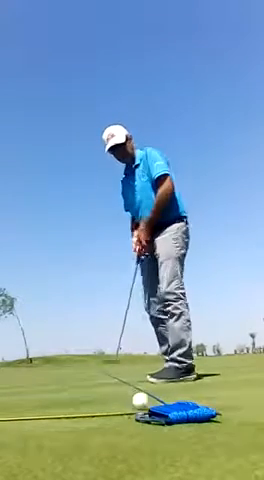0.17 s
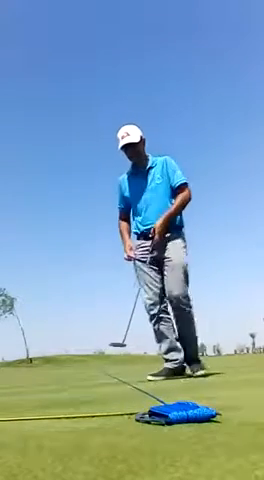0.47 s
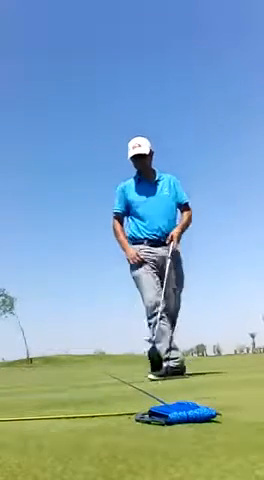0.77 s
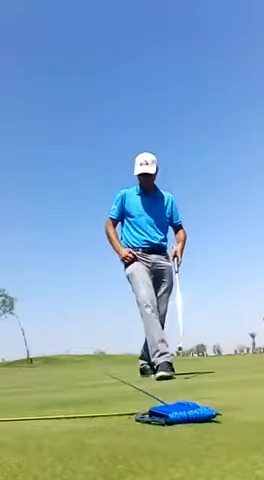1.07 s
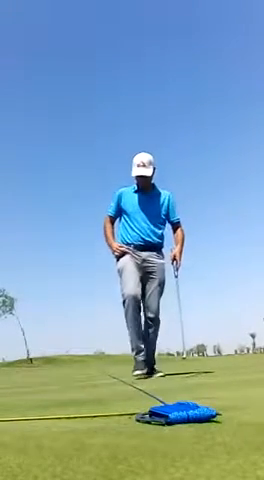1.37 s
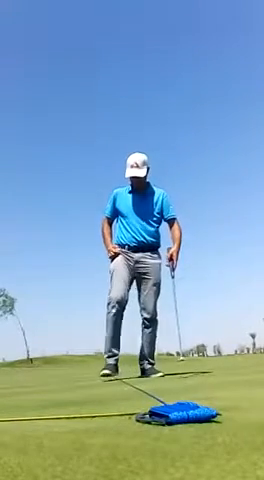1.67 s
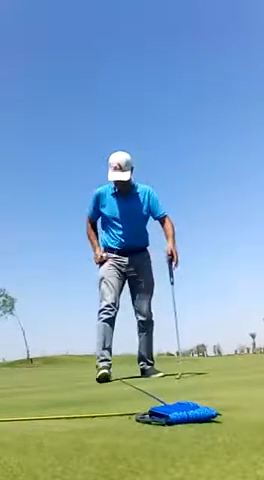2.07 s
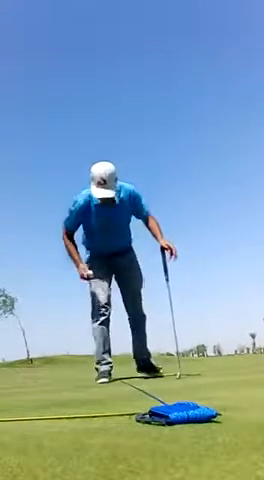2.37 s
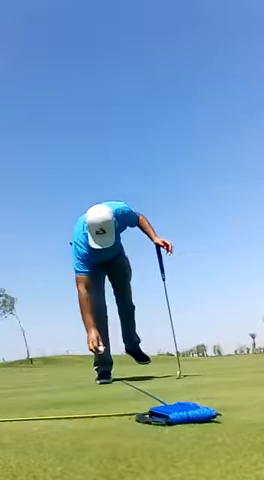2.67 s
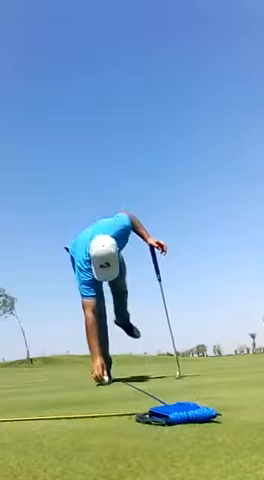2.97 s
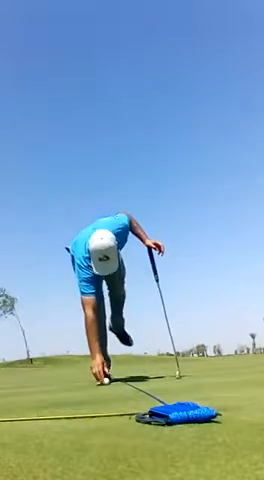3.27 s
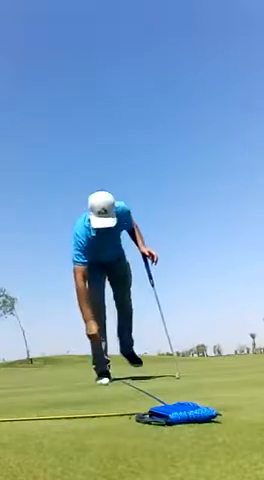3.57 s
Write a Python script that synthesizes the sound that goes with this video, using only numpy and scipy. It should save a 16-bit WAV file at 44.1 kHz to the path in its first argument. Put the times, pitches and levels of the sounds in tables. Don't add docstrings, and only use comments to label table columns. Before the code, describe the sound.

A golf ball falls into a plastic cup close by: low soft bumps from 0.35 s, bright hard clacks and hollow knocks from 0.45 to 0.7 s, fading by 0.8 s. Light wind rumble, distant machine drone and faint hiss continue throughout. Small birds chirp at left, clearer near 1.0-1.4, 2.5-2.8 and 3.1-3.7 s. A faint bump comes at 1.5 s, a dull turf tick at 2.16 s, and a tiny snap at 2.6 s.

```python
import sys
import numpy as np
from scipy import signal
from scipy.fft import rfft, irfft
from scipy.io import wavfile

SR = 44100
rng = np.random.default_rng(int(sys.argv[2]) if len(sys.argv) > 2 else 0)


def put_to_file(sound):
    columns = np.atleast_2d(sound).T
    safe = np.clip(columns, -1, 1)
    whole_steps = np.round(safe * 32767)
    wavfile.write(sys.argv[1], SR, whole_steps.astype(np.int16))


def boost_factor(decibels):
    exponent = np.asarray(decibels, float) / 20
    return 10 ** exponent


N = 163611

# t/s, level/dB
WIND_STRENGTH = [(0.0, -41.5), (0.17, -46), (0.54, -42), (0.91, -45), (1.5, -47), (1.61, -45),
                 (1.97, -46.5), (2.31, -45), (2.87, -44.5), (3.22, -45.5), (3.35, -47), (3.71, -46)]
# f/Hz, level per Hz/dB
WIND_COLOUR = [(25, -16), (45, -33), (65, 0), (110, 5.5), (200, -3.5), (350, -13), (600, -19), (1200, -41)]
# f/Hz, width/Hz, level/dB
MACHINES = [(131.2, 12.3, -47.5), (66.9, 36.5, -45), (334.1, 11.6, -63.5)]
# f/Hz, level per Hz/dB
HISS_ALIKE = [(500, -25), (800, 1.5), (1500, -2), (3000, -1.5), (5000, -1.5), (7500, -16), (11500, -5.5),
              (15800, -1)]
# f/Hz, level per Hz/dB
HISS_OPPOSITE = [(40, 0), (133, -0.5), (300, -5.5), (1200, -22.5), (4500, -11), (7500, -15.5),
                 (11500, -9.5), (15800, -6.5)]
# t/s, length/s, from f/Hz, to f/Hz, level/dB
CLEAR_CHIRPS = [(1.036, 0.021, 3710, 5800, -42.5), (1.049, 0.039, 4780, 3810, -41.5),
                (1.06, 0.018, 4450, 4390, -48), (1.113, 0.038, 3880, 3720, -48),
                (1.16, 0.014, 3680, 3630, -54), (1.214, 0.033, 5060, 4590, -42.5),
                (1.253, 0.027, 5860, 3950, -43.5), (1.273, 0.023, 5640, 4900, -46),
                (1.291, 0.02, 3840, 4970, -39), (1.307, 0.015, 4980, 3700, -35.5),
                (1.328, 0.031, 3774, 4820, -39.5), (1.34, 0.042, 4050, 5020, -44.5),
                (1.385, 0.032, 4800, 4660, -56), (2.499, 0.027, 4480, 5030, -37),
                (2.526, 0.0089, 4740, 3800, -45), (2.537, 0.027, 3750, 3800, -57.5),
                (2.558, 0.0099, 4530, 6060, -46.5), (2.58, 0.0081, 4180, 4940, -33),
                (2.608, 0.0093, 5500, 6080, -57), (2.715, 0.016, 3830, 4380, -43.5),
                (2.779, 0.022, 3860, 4860, -43), (2.772, 0.025, 4230, 4740, -48.5),
                (2.8, 0.014, 4200, 4800, -44), (3.147, 0.0158, 4430, 5800, -42),
                (3.162, 0.014, 5500, 3980, -49), (3.174, 0.017, 3840, 4200, -40.5),
                (3.156, 0.023, 6200, 6150, -56), (3.522, 0.01, 4000, 5940, -47.5),
                (3.531, 0.015, 5970, 6020, -52), (3.552, 0.023, 5820, 4050, -38),
                (3.556, 0.017, 5860, 5250, -49), (3.607, 0.012, 5960, 4100, -43),
                (3.633, 0.02, 3960, 4980, -37.5), (3.675, 0.033, 4020, 5110, -34.5),
                (3.589, 0.0098, 5200, 6000, -60),
                (.128, 0.044, 4900, 3900, -53), (0.2, 0.023, 4840, 3880, -56),
              (0.285, 0.018, 4500, 5160, -48.5), (0.685, 0.025, 4600, 4930, -45),
              (0.703, 0.01, 5400, 4160, -46), (0.756, 0.012, 4350, 4340, -42.5),
              (0.788, 0.0079, 5700, 5750, -51.5), (0.915, 0.031, 4800, 4590, -48.5),
              (0.956, 0.038, 4200, 3970, -51.5), (1.435, 0.031, 5800, 4700, -55),
              (1.475, 0.047, 4400, 4640, -57), (1.525, 0.039, 4550, 4580, -56),
              (1.61, 0.048, 4000, 4310, -60), (1.685, 0.047, 4900, 4610, -50.5),
              (1.696, 0.051, 4100, 3930, -54), (1.97, 0.023, 3660, 4250, -51),
              (2.146, 0.0071, 4200, 4240, -50.5), (2.18, 0.073, 4900, 4670, -63),
              (2.327, 0.016, 4200, 4370, -47), (2.365, 0.035, 5100, 5150, -52.5),
              (2.624, 0.033, 5430, 5050, -54), (2.646, 0.02, 5250, 4000, -53),
              (2.69, 0.056, 5300, 4760, -50), (3.284, 0.015, 4400, 4600, -65),
              (3.178, 0.026, 5250, 4880, -50)]
# t/s, length/s, from f/Hz, to f/Hz, level/dB
HOARSE_STROKES = [(3.133, 0.044, 5600, 4100, -42), (3.195, 0.0366, 3300, 4500, -52),
                  (3.232, 0.0475, 4600, 3350, -51.5), (3.2, 0.0274, 3800, 3400, -52),
                  (1.8, 0.038, 3900, 3600, -57), (1.5, .04, 4100, 4100, -50), (2.42, .02, 4200, 4600, -56),
                  (3.4, 0.066, 4400, 3800, -48), (1.3, .05, 4000, 7400, -56), (3, .05, 4000, 3500, -60),
                  (2.8, 0.058, 5300, 3700, -64), (2.6, 0.032, 5100, 5750, -56),
                  (3.28, 0.022, 5500, 5450, -57), (2.2, .025, 3900, 5400, -49),
                  (2.81, .04, 4200, 3800, -57), (2.21, .03, 3700, 4500, -64),
                  (3.535, 0.014, 5500, 5740, -44.5)]
# t/s, peak level/dB
BIRD_SNAPS = [
    (.2555, -42),
    (2.291, -37),
    (2.585, -26.5),
    (2.619, -42),
]
# t/s, peak level/dB, f/Hz
LIP_BUMPS = [
    (0.3521, -18.5, 117),
    (.371, -24, 115),
    (0.393, -19, 202.6),
    (0.401, -17, 154),
    (0.4038, -33, 352),
    (0.4497, -32, 109),
    (0.4613, -23.5, 140),
    (.516, -32, 314),
    (0.652, -34, 196),
    (1.532, -31, 160),
]
# t/s, peak level/dB, tilt from low to high tones/dB, third tone/dB, pitch factor of the spot
WALL_CLACKS = [
    (.45, -19, 0, 3.5, 0.97),
    (.5157, -21, 7, -1.5, 1),
    (.5806, -43, -1, -6, 0.92),
    (.5995, -32, 2, 7, 0.98),
    (.6858, -32, 4, 0, 1.02),
    (.7375, -41, 0, -12, 0.92),
    (.781, -44, 5, -10, .98),
]
# f/Hz, level/dB, time to fall 60 dB/s
WALL_TONES = [(575, -3, 0.0054), (1550, -17, 0.004), (2280, -9.5, 0.015), (3250, -5, .011),
              (4050, -8, 0.005), (4790, -2, 0.012), (6800, -28, 0.008)]
# t/s, peak level/dB, tilt from low to high tones/dB, third tone/dB, pitch factor of the spot
BOTTOM_KNOCKS = [
    (.5049, -25.5, 28, 19, 1),
    (.5283, -33.5, 13, 24, 0.98),
    (.6368, -29.5, 24.5, 17, 1),
    (.6855, -46, -6, -15, 1),
    (.7051, -31.5, 29, 21, 0.91),
    (.7582, -47, -8, -4, 0.93),
]
# f/Hz, level/dB, time to fall 60 dB/s
BOTTOM_TONES = [(433, 1, 0.02), (1150, 5, 0.0038), (2194, -39, 0.008), (3340, -24.5, 0.01)]


def rms_one(x):
    return x / np.sqrt(np.mean(x ** 2) + 1e-20)


def drift(rate_hz):
    r = np.exp(-40 * np.pi * rate_hz / SR)
    draws = rng.standard_normal(N // 20 + 2002)
    slow = signal.lfilter([1], [1, -2 * r, r * r], draws)[2000:]
    return np.interp(np.arange(N) / 20, np.arange(len(slow)), rms_one(slow))


def coloured(spectrum):
    hz, db = np.transpose(spectrum)
    log_hz = np.log(np.fft.rfftfreq(N, 1 / SR) + 1)
    shape = boost_factor(np.interp(log_hz, np.log(hz), db))
    return rms_one(irfft(rfft(rng.standard_normal(N)) * shape, N))


def resonance(x, hz, t60):
    r = boost_factor(-60 / (t60 * SR))
    w = 2 * np.pi * hz / SR
    return signal.lfilter([0, np.sin(w)], [1, -2 * r * np.cos(w), r * r], x + 1e-18)


def wind():
    strength_db = np.interp(np.arange(N) / SR, *np.transpose(WIND_STRENGTH))
    return boost_factor(strength_db + 0.5 + 2.26 * drift(15.3)) * coloured(WIND_COLOUR)


def drones():
    out = np.zeros(N)
    for hz, width_hz, db in MACHINES:
        hum = rms_one(resonance(rng.standard_normal(N), hz, 3.83 / width_hz))
        out += boost_factor(db + 0.5 * drift(1.0)) * hum
    return out


def recorder_noise():
    whine = boost_factor(-78) * np.sin(2 * np.pi * 12897 * np.arange(N) / SR)
    alike = boost_factor(-55) * coloured(HISS_ALIKE) + whine
    opposite = boost_factor(-51) * coloured(HISS_OPPOSITE)
    return np.array([alike + opposite, alike - opposite])


def air():
    left_right = boost_factor([[-0.6], [0.6]])
    return (wind() + drones()) * left_right + recorder_noise()


def chatter():
    draw = rng.standard_normal((150, 4))
    when = np.linspace(0, N / SR, len(draw)) + 0.02 * np.abs(draw[:, 0])
    pitch = 4550 * (1 + 0.07 * np.clip(draw[:, 1:3], -2, 2))
    level_db = -68 + 1.5 * draw[:, 3]
    return [(s, 0.025, a, b, db) for s, (a, b), db in zip(when, pitch, level_db)]


def whistle(waver, s, length, from_hz, to_hz, db):
    i = int(s * SR)
    u = np.linspace(0, 1, int(length * SR))
    steep_drop = (to_hz - from_hz) / length < -50000
    way = u ** 1.9 if steep_drop else 1 - (1 - u) ** 1.5
    unsteady = 1 + waver[np.minimum(i + np.arange(len(u)), N - 1)]
    hz = (from_hz + (to_hz - from_hz) * way) * unsteady
    swell = np.abs(np.sin(np.pi * u ** 1.3)) ** 0.7
    return i, boost_factor(db + 4.5) * swell * np.sin(2 * np.pi * np.cumsum(hz) / SR)


def bird_song():
    song = np.zeros(N + SR)
    clear_waver, hoarse_waver = 0.012 * drift(360), 0.06 * drift(1200)
    clear_notes = CLEAR_CHIRPS + chatter()
    for notes, waver in ((clear_notes, clear_waver), (HOARSE_STROKES, hoarse_waver)):
        for row in notes:
            i, note = whistle(waver, *row)
            song[i:i + len(note)] += note
    return song[:N] * boost_factor(3.5 * drift(130))


def click_at(s, size):
    click = np.zeros(N)
    click[int(s * SR)] = size
    return click


def snaps():
    clicks = sum(click_at(s, boost_factor(db)) for s, db in BIRD_SNAPS)
    return resonance(clicks, hz=5500, t60=0.0021)


def ports(x, lag, shade_hz, right_db):
    f = np.fft.rfftfreq(N, 1 / SR)
    delay = np.exp(-2j * np.pi * f * lag / SR)
    shade = boost_factor(right_db * f / (f + 400)) / np.sqrt(1 + (f / shade_hz) ** 2)
    return np.array([x, irfft(rfft(x) * delay * shade, N)])


def outdoor_echo(direct):
    t = np.arange(SR // 3) / SR
    tail = rng.standard_normal((2, len(t))) * boost_factor(-60 * t / 0.4) * (t > 0.004)
    tail = boost_factor(-8) * tail / np.sqrt(np.mean(tail ** 2) * len(t))
    tail[:, int(0.014 * SR)] += boost_factor(-12)
    return signal.fftconvolve(direct, tail, axes=1)[:, :N]


def birds():
    direct = ports(bird_song() + snaps(), lag=4.13, shade_hz=2000, right_db=-1.3)
    return direct + outdoor_echo(direct)


def soften(x, hz):
    r = np.exp(-2 * np.pi * hz / SR)
    return signal.lfilter([(1 - r) ** 2], [1, -2 * r, r * r], x)


def lip_bumps():
    out = np.zeros(N)
    for s, db, hz in LIP_BUMPS:
        out += soften(resonance(click_at(s, boost_factor(db + 3)), hz, t60=0.042), hz=624)
    return out


def strike(hits, tones, again_s, again_size, trade=0):
    out = np.zeros(N)
    clicks = np.zeros(SR // 10)
    clicks[0] = 1
    clicks[int(again_s * SR)] = again_size
    for s, db, tilt_db, spot_db, factor in hits:
        i = int(s * SR)
        for k, (hz, level_db, t60) in enumerate(tones):
            tilt = tilt_db * (k / (len(tones) - 1) - 0.5)
            spot = spot_db * ((k == 2) - trade * (k == 1))
            ring = resonance(clicks, hz * factor, t60)
            out[i:i + len(clicks)] += boost_factor(db + level_db + tilt + spot) * ring
    return out


def wall_clacks():
    clacks = strike(WALL_CLACKS, WALL_TONES, again_s=0.00126, again_size=0.89 * boost_factor(3), trade=0.8)
    return boost_factor(-3.5) * signal.sosfilt(signal.butter(4, 5600, fs=SR, output="sos"), clacks)


def bottom_knocks():
    knocks = strike(BOTTOM_KNOCKS, BOTTOM_TONES, again_s=0.00046, again_size=-boost_factor(16))
    return boost_factor(-3) * soften(knocks, hz=1690)


def tick():
    return soften(resonance(click_at(2.1643, -boost_factor(-26)), hz=1600, t60=0.002), hz=3460)


def scene():
    near_ground = lip_bumps() + wall_clacks() + bottom_knocks() + tick()
    return air() + birds() + ports(near_ground, lag=1.8, shade_hz=6600, right_db=-4.5)


def band_limit(x):
    return signal.sosfilt(signal.butter(12, 15920, fs=SR, output="sos"), x)


def record(dry):
    low_cut = signal.butter(4, 68.2, "high", fs=SR, output="sos")
    top_cut = signal.cheby2(12, 70, 16100, fs=SR, output="sos")
    mix = signal.sosfilt(top_cut, signal.sosfilt(low_cut, dry)) + 0.002
    return band_limit(mix)


dry = scene()
out = record(dry)
put_to_file(out)
```